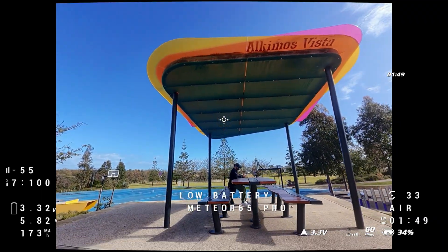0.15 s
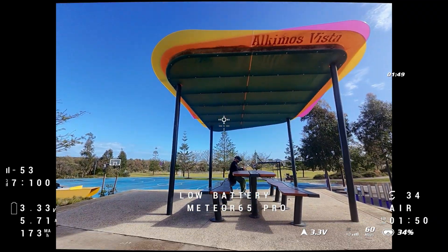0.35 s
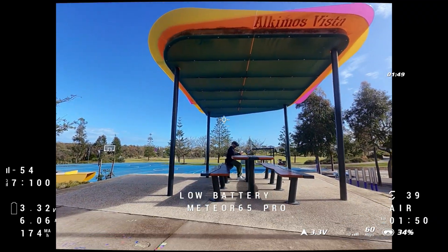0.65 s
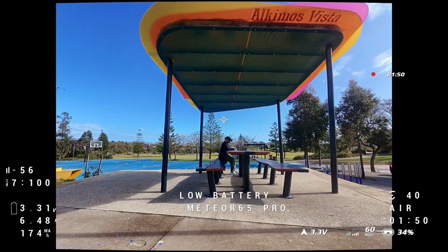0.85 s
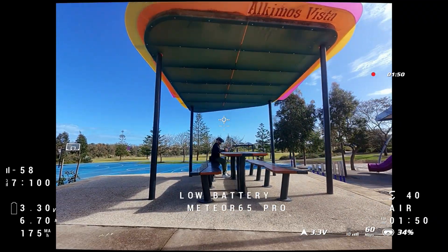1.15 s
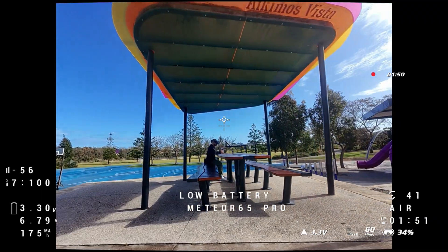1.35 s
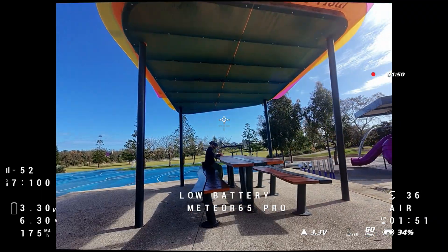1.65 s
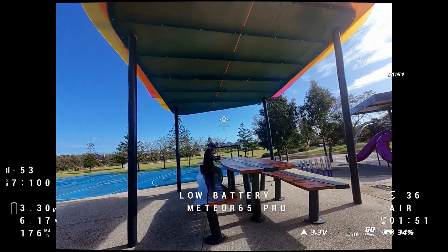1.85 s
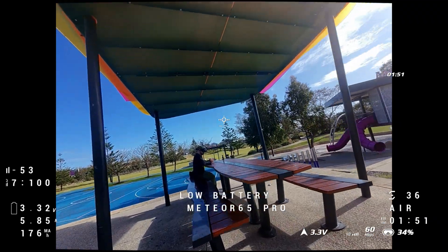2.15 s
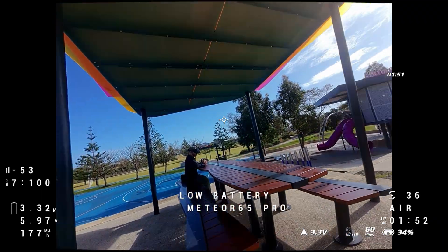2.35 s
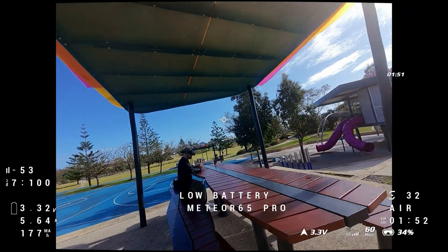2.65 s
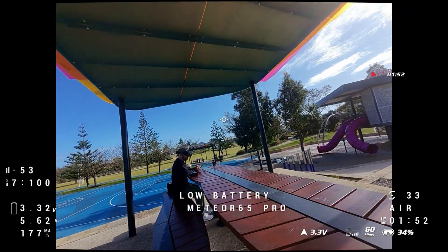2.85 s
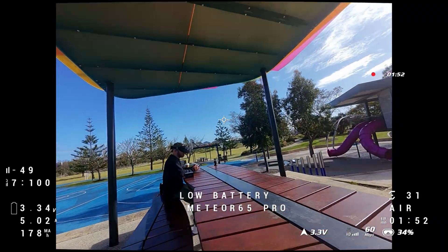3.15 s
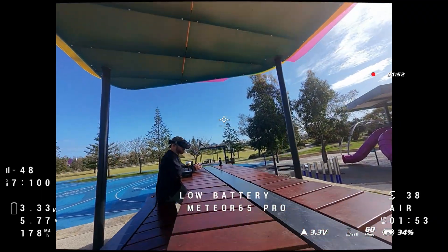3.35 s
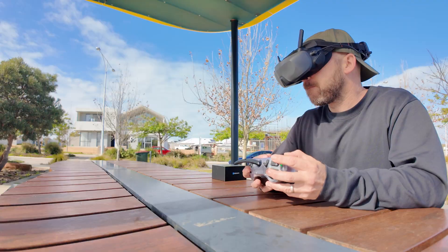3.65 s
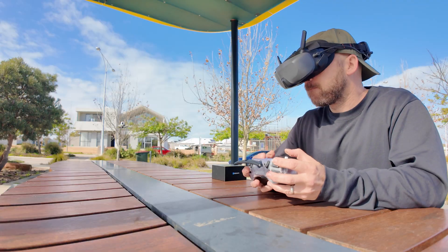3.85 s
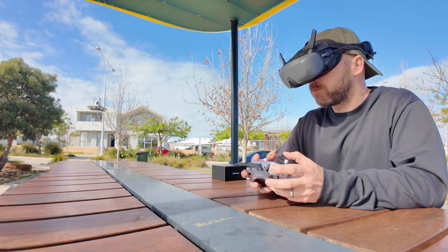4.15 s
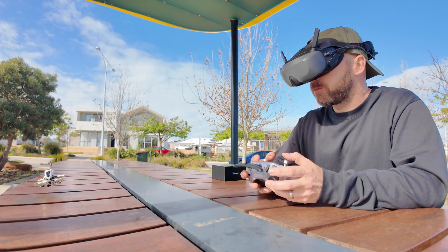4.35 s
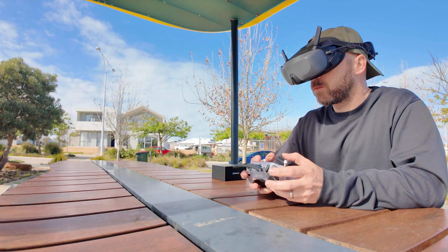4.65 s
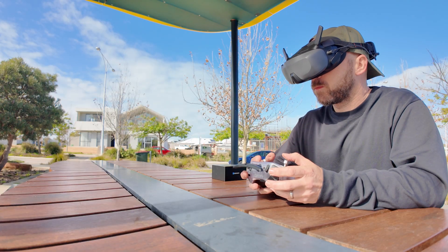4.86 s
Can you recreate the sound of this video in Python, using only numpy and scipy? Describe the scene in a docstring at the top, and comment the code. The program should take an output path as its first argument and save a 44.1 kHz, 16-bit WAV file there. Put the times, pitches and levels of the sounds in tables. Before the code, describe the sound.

Beating, nasal propeller tones start distant and swell toward a single close microphone outdoors. Raspy torn air surges midway, the pitch dips and rises, and the whine tightens over the tabletop before stopping almost instantly. A quiet pause follows, then a sharp cluster of plastic-on-wood knocks, a softer second bounce, and a few faint high clicks over low park background and slight shelter reflections.

```python
"""Small drone lands on a picnic table

Under a park shelter, a tiny four-rotor drone closes from about 8 m to 0.6 m, whining and hissing.
Rotor tones follow shaft and blade rates; coloured noise makes the torn air and the downwash.
The motors ring briefly at 5 kHz and cut; it drops onto the planks and bounces once: modes and noise bands.
Hand-controller switches click; a short roof echo and a faint outdoor rumble lie around it all."""
import sys
import numpy as np
from scipy import signal
from scipy.fft import rfft, irfft, next_fast_len
from scipy.io import wavfile

SR = 44100
rng = np.random.default_rng(int(sys.argv[2]) if len(sys.argv) > 2 else 0)


def file_out(sig):
    """Save sig as 16-bit WAV at sys.argv[1]."""
    # one column per channel
    cols = np.atleast_2d(sig).T
    # limit, then scale
    lim = np.clip(cols, -1, 1)
    pcm = np.round(lim * 32767).astype(np.int16)
    wavfile.write(sys.argv[1], SR, pcm)


N = 220896
TIME = np.arange(N) / SR  # s

# Spectrum levels below are relative: each coloured noise is scaled to rms 1 before its own level.
# Flight path: t/s, distance/m
DISTANCE = [(0, 7.9), (1.3, 6.6), (2.0, 7.6), (2.8, 5.33), (3.35, 3.59), (3.55, 1.3), (3.72, .85),
            (4.07, 0.62)]
# Blade-pass rates: t/s, fastest rotor f/Hz, slowest rotor f/Hz, place of the steering rotor between (0-1)
SPEED = [(0, 1451, 1376, 0.52), (.4, 1369, 1287, 0.28), (.9, 1494, 1315, 0.54), (1.2, 1563, 1410, 0.44),
         (1.55, 1521, 1391, .65), (1.85, 1483, 1351, .7), (2.25, 1480, 1312, 0.91),
         (2.55, 1509, 1304, 0.69), (3.0, 1444, 1238, .42), (3.27, 1319, 1114, 0.55),
         (3.45, 1477, 1256, .08), (3.58, 1590, 1297, 0.04), (3.7, 1723, 1445, 0.95),
         (3.9, 1662, 1436, 0.94), (4.07, 1645, 1470, .82)]
# Sinking into its own downwash turns clean overtones into rasp: t/s, turbulent share (0-1)
TURBULENCE = [(0, 0.15), (1.4, 0), (2.0, 0.52), (2.9, 0.99), (3.5, 0.27), (3.75, 0.27), (4.05, 0.46)]
# Rotors in the order of all per-rotor arrays
ROTOR_NAMES = ("fastest", "steering", "unbalanced", "slowest")
# Balance between those rotors: unbalance level/dB, blade tone level/dB, overtones level/dB (relative)
ROTOR_BALANCE = [(-2.5, 0.5, -7), (-15, 0.5, -5), (10.5, -4, -7.5), (4, 0, -11)]
UNBALANCED_SHARE = .26  # place of the unbalanced rotor: slowest 0, fastest 1
HOVER_HZ, DB_PER_SPEED_OCTAVE = 1515, 9  # all voices grow with mean blade-pass rate
CUSHION_S = 0.11  # build-up time constant of the air cushion over the table
MOTORS_OFF_S, SPIN_DOWN_T60_S, BRAKE_T60_S = 4.072, .125, .05

# Voice levels: level/dB at 1 m and hover speed, dB per halving of distance,
# dB added in full turbulence, dB added on the full cushion
HUM_LAW = (-65, 3.4, 13.5, 15)
WHINE_LAW = (-52, 5, -2.5, 5.5)
BUZZ_LAW = (-54, 5.5, -2, 4)
SIZZLE_LAW = (-53, 7, 1, -5)
RASP_LAW = (-53.5, 6.5, 2.5, -4)
HISS_LAW = (-50.5, 7, 7.5, -1)
RUSH_LAW = (-48.5, 6, -1.5, 5.5)
WASH_LAW = (-61, 12, -2.5, 9.5)
# A rotor's blade tone swells as the drone tilts: t/s, length/s, rotor, level/dB
WHINE_SWELLS = [(.8, .24, "unbalanced", 9), (1.3, .28, "fastest", 14.5), (1.29, 0.3, "steering", 9),
                (2.27, 0.17, "steering", 12), (2.62, 0.23, "fastest", 7.5), (3.02, 0.33, "unbalanced", 15),
                (3.12, 0.15, "slowest", 9.5), (3.28, .12, "steering", 11.5), (3.5, .2, "steering", 7.5),
                (3.72, 0.11, "fastest", 4), (3.95, 0.13, "steering", 7.5), (4.05, .05, "slowest", 5.5)]
# A rotor's overtones swell: t/s, length/s, rotor, level/dB
BUZZ_SWELLS = [(.1, .12, "steering", 8), (.66, 0.12, "steering", 2.5), (1.06, .16, "steering", 12.5),
               (1.35, 0.46, "unbalanced", 14), (3.1, 0.2, "fastest", 18), (3.52, 0.23, "fastest", 17.5),
               (3.77, 0.099, "steering", 7.5)]
# Surges of torn air: t/s, length/s, duct hiss level/dB, broad rush level/dB, blade rasp level/dB
SURGES = [(2.25, 0.16, 4, -3, -4), (2.65, 0.2, 5, 0, -2), (2.99, 0.12, 8.5, 2, 7.5),
          (3.11, 0.13, 6.5, 9, 13), (3.47, 0.17, 0.5, 0, 12.5)]
# Brief puff off the planks just before the cut: t/s, length/s, level/dB
PUFF = (4.046, 0.012, 10.7)

# Filter on the low blade overtones: f/Hz, level/dB
BUZZ = [(1900, -5), (2350, -31), (2700, 5.5), (3100, 0), (3450, -0.5), (3850, -33)]
# Filter on the high blade overtones: f/Hz, level/dB
SIZZLE = [(3700, -14), (4300, 5), (5200, 0.5), (5800, -12), (7300, -2), (9600, -2), (11000, -5),
          (13000, -26), (15500, -31)]
# Rasp of blades in turbulence: f/Hz, level/dB per Hz
RASP = [(2300, -63), (2750, -1), (3080, 4), (3300, -1), (3550, 5), (3800, -31)]
# Air torn by the blade tips in the ducts: f/Hz, level/dB per Hz
HISS = [(3950, -38), (4400, -8), (5200, -8.5), (5700, -16), (6400, -6), (7200, -2.5), (7900, -2.5),
        (8600, -2.5), (9300, -6), (10000, -7.5), (10700, -13.5), (12000, -52)]
# Broad rush of air: f/Hz, level/dB per Hz
RUSH = [(150, -21), (400, -8), (850, -9), (1400, -1), (2400, 1), (3400, 4), (3850, -3), (4500, 0.5),
        (8300, -1), (10300, -10), (12300, -4.5), (13300, -12), (14800, -16), (15500, -9.5)]
# Downwash on the planks: f/Hz, level/dB per Hz
WASH_COLOUR = [(25, -60), (40, -38), (90, -16), (250, -9), (600, 5), (900, 1.5), (1500, 6.5), (3000, 4),
               (6000, -22), (12000, 1), (16000, -20)]
# Reflections off table, paving and roof: delay at start/s, delay at end/s, level/dB
BOUNCES = [(.00094, 0.00076, -30.5), (.0024, .0037, -19), (.0061, .0094, -11)]

# Drone touches the table: t/s, then relative crack level/dB, frame ring level/dB, plank thud level/dB
CONTACTS = [(4.4623, -28, -63, -79), (4.4650, -23.5, -40, -43), (4.4667, -8, -25.5, -32.5),
            (4.4751, -19, -28.5, -26.5), (4.483, -27, -30.5, -37.5), (4.626, -41, -44, -39),
            (4.6380, -28.5, -36, -37), (4.6510, -29, -40.5, -23.5), (4.6600, -45.5, -44.5, -40.5),
            (4.8130, -78, -81, -52.5)]
# Dense clatter of ducts and blades: f/Hz, level/dB per Hz, t60/s
CRACK = [(151, -25, 0.14), (400, 5, 0.048), (875, 3, 0.067), (1140, 2.5, 0.033), (2170, 5.5, 0.079),
         (4000, 5.5, 0.03), (5200, 4.5, 0.048), (6240, -4.5, 0.11), (8500, -9.5, 0.047),
         (11400, -18, 0.019), (14370, -5, 0.054)]
# Modes of the plastic frame: f/Hz, level/dB, t60/s
FRAME = [(944, -10.5, 0.21), (1068, 0, 0.072), (1152, 1.5, 0.089), (1290, -7.5, .09), (1329, -4, 0.19),
         (1613, 1, 0.056), (1846, -26.5, 0.17), (2070, -13.5, 0.063), (2288, -12.5, 0.18),
         (2340, -11.5, 0.15), (3376, -6, 0.12), (4300, -15, 0.059), (4600, -17, 0.13), (5230, -2, 0.091),
         (6211, -22.5, 0.069), (14300, -19, .04)]
# Modes of the planks: f/Hz, level/dB, t60/s
PLANKS = [(162.4, -21, 0.82), (250, -8.5, 0.36), (284, -6.5, 0.17), (303, -4, 0.11), (337, -3, 0.27),
          (384, -13.5, 0.19), (581.8, -6.5, 0.44), (603, -5, 0.22), (661, -9, 0.29)]
# Dull boom of the table: f/Hz, level/dB per Hz, t60/s
BOOM = [(59.3, -5, 0.25), (170, -18.5, 0.89), (307, 5, 0.24), (446, -14.5, 0.48), (630, 1, 0.49),
        (865, -13, 0.26), (1350, 2.5, 0.077), (2230, -12.5, .1), (5950, -51, .05)]

# Short 5 kHz rings from the motors just before the cut (3.994, 4.051);
# later rows: hand-controller switches: t/s, relative level/dB
SHORT_RINGS = [(3.994, -35), (4.051, -35), (4.598, -46), (4.638, -32.5), (4.654, -36.5), (4.664, -40),
               (4.931, -52), (4.941, -46.5), (4.954, -42), (4.9632, -38)]
# Modes of each short ring: f/Hz, level/dB, t60/s
RING_MODES = [(4900, -5, .035), (5040, -6, .045), (5150, -4, .055), (5350, -5, .045)]
# Broad snap under each short ring: f/Hz, level/dB per Hz, t60/s
SNAP = [(60, -11, .3), (120, 5.5, 0.69), (770, 5.5, 0.68), (1300, -16, .1), (3660, 5, 0.055),
        (5200, -0.5, 0.029), (6400, 1, 0.056), (8240, 0.5, 0.066), (15100, -11, 0.034)]

SHELTER_T60_S, SHELTER_DB = 0.22, -18.5
# Open-air background: f/Hz, level/dB per Hz
PARK = [(25, -29), (42, -28.5), (60, 5.5), (90, 0.5), (160, 0), (220, -4.5), (300, -5.5), (700, -7),
        (1400, -9), (2800, -18), (4500, -32.5), (9000, -35.5), (16000, -35)]
PARK_DB = -60.5
CUTOFF_HZ = 15900


def drone():
    """Four rotors beat against each other and chop the air; all fades fast when the motors stop."""
    speeds = rotor_speeds()
    turbulent = np.clip(in_time(TURBULENCE)[0], 0, 1)
    levels = loudness(speeds, turbulent)
    rotors = [rotor(hz, wobble=.004, flutter_db=2.5, between_db=-11.0) for hz in speeds]
    shafts, blades, overtones, pulsing = zip(*rotors)
    tones = rotor_tones(shafts, blades, overtones, levels, turbulent)
    air = torn_air(pulsing, levels, turbulent)
    wash = from_db(levels["wash"]) * noise(WASH_COLOUR)
    # braked rotors go silent first, while the stirred air takes a moment to settle
    since_cut = np.maximum(TIME - MOTORS_OFF_S, 0)
    braked = from_db(-60 * since_cut / BRAKE_T60_S)
    settling = from_db(-60 * since_cut / SPIN_DOWN_T60_S)
    return tones * braked + bounced(air + wash) * settling


def rotor_tones(shafts, blades, overtones, levels, turbulent):
    """Unbalance hums at shaft rate, blades whine at blade rate; overtones thin out in turbulence."""
    unbalance_db, blade_db, overtone_db = np.transpose(ROTOR_BALANCE)
    hum = together(shafts, unbalance_db) * from_db(levels["hum"])
    whine = together(blades, blade_db, rotor_swells(WHINE_SWELLS)) * from_db(levels["whine"])
    low_overtones = [coloured(x, BUZZ) for x in overtones]
    buzz = together(low_overtones, overtone_db, rotor_swells(BUZZ_SWELLS)) * from_db(levels["buzz"])
    sizzle = coloured(together(overtones, overtone_db), SIZZLE) * from_db(levels["sizzle"])
    return hum + whine + np.sqrt(1 - turbulent) * (buzz + sizzle)


def torn_air(pulsing, levels, turbulent, chop=0.13):
    """Turbulent rasp, duct hiss and broad rush, all chopped by the passing blades."""
    rasp = np.sqrt(turbulent) * noise(RASP) * from_db(levels["rasp"])
    hiss = noise(HISS) * from_db(levels["hiss"] + 1.0 * drift(23))
    rush = noise(RUSH) * from_db(levels["rush"])
    return (rasp + hiss + rush) * rms_one(1 + chop * sum(pulsing))


def rotor(blade_hz, wobble, flutter_db, between_db, count=33, size=2048):
    """One three-bladed rotor: shaft hum, blade tone, overtones, and the pulsing of its blades."""
    # the flight controller keeps trimming the speed
    shaft_hz = blade_hz / 3 * (1 + wobble * drift(25))
    turns = np.cumsum(shaft_hz) / SR + rng.random()
    # one turn's pressure: unequal blades put weaker lines between the multiples of the blade rate
    orders = np.arange(count + 1)
    strengths = np.where(orders % 3, from_db(between_db), 1) * (orders > 3)
    phases = np.exp(2j * np.pi * rng.random(count + 1))
    cycle = irfft(strengths * phases, size)
    overtones = cycle[(turns * size).astype(int) % size]
    hum = np.sin(2 * np.pi * turns)
    pulsing = np.sin(6 * np.pi * turns)
    flutter = from_db(flutter_db * drift(33))
    return hum * flutter, pulsing * flutter, overtones * flutter, pulsing


def rotor_speeds():
    """Blade-pass rates of the four rotors: two set the range, two run in between."""
    fastest, slowest, steering = in_time(SPEED)
    spread = fastest - slowest
    return np.array([fastest, slowest + steering * spread, slowest + UNBALANCED_SHARE * spread, slowest])


def loudness(speeds, turbulent):
    """Level in dB of each voice, from distance, speed, turbulence, air cushion and surges."""
    halvings = -np.log2(np.maximum(in_time(DISTANCE)[0], 1e-2))  # of the distance, from 1 m
    effort_db = DB_PER_SPEED_OCTAVE * np.log2(speeds.mean(axis=0) / HOVER_HZ)
    cushion = np.exp(np.minimum(TIME - MOTORS_OFF_S, 0) / CUSHION_S)
    laws = dict(hum=HUM_LAW, whine=WHINE_LAW, buzz=BUZZ_LAW, sizzle=SIZZLE_LAW,
                rasp=RASP_LAW, hiss=HISS_LAW, rush=RUSH_LAW, wash=WASH_LAW)
    levels = {}
    for voice, (base_db, near_db, turbulent_db, cushion_db) in laws.items():
        place_db = near_db * halvings + cushion_db * cushion
        levels[voice] = base_db + effort_db + place_db + turbulent_db * turbulent
    hiss_surge, rush_surge, rasp_surge = swells(SURGES)
    levels["hiss"] += hiss_surge
    levels["rush"] += rush_surge
    levels["rasp"] += rasp_surge
    levels["wash"] += swells([PUFF])[0]
    return levels


def bounced(x):
    """Each moving reflection combs the sound with slowly sliding notches."""
    out, power = x.copy(), 1
    for first_s, last_s, level_db in BOUNCES:
        delay = np.linspace(first_s, last_s, N)
        out += from_db(level_db) * np.interp(TIME - delay, TIME, x)
        power += from_db(level_db) ** 2
    return out / np.sqrt(power)


def landing(crack_trim_db=-8.0, boom_db=-6.0):
    """The frame hits on an edge, rattles, bounces and comes down flat on the planks."""
    s, crack_db, frame_db, thud_db = np.transpose(CONTACTS)
    plastic = clatter(s, crack_db + crack_trim_db, CRACK) + struck(s, frame_db, FRAME)
    wood = clatter(s, thud_db + boom_db, BOOM) + struck(s, thud_db, PLANKS)
    return plastic + wood


def short_rings(snap_db=-14.0):
    """Motor rings before the cut, then controller switches: close 5 kHz modes over a broad snap."""
    s, level_db = np.transpose(SHORT_RINGS)
    return struck(s, level_db, RING_MODES) + clatter(s, level_db + snap_db, SNAP)


def shelter(x, dull_hz=3000):
    """Roof, posts and paving throw back a short, dull scatter: low-passed, decaying noise."""
    t = TIME[:SR // 2]
    decay = from_db(-60 * t / SHELTER_T60_S)
    scatter = rng.standard_normal(len(t)) * decay * (t > .008)  # first return after 8 ms
    scatter = signal.sosfilt(signal.butter(2, dull_hz, fs=SR, output="sos"), scatter)
    return signal.fftconvolve(x, scatter / np.linalg.norm(scatter))[:N]


def park():
    """Steady open-air rumble: low-weighted noise."""
    return from_db(PARK_DB) * noise(PARK)


def struck(times, levels_db, modes):
    """Every blow rings every mode as a decaying sine, each about a decibel off its usual strength."""
    out = np.zeros(N)
    for k, (hz, mode_db, t60) in enumerate(modes):
        r, w = from_db(-60 / (t60 * SR)), 2 * np.pi * hz / SR
        blows = clicks(times, levels_db + mode_db + rng.standard_normal(len(times)))
        ring = signal.lfilter([0, np.sin(w)], [1, -2 * r * np.cos(w), r * r], blows + 1e-18)
        out += (-1) ** k * ring  # neighbours swing in opposite sense
    return out


def clatter(times, levels_db, colour):
    """Countless close modes: noise that dies at its own pace in each band."""
    edges = np.geomspace(55, 16000, 24)  # Hz
    start = int(min(times) * SR)
    blows = clicks(times, levels_db)[start:]
    out, power = np.zeros(N), 0
    for low, high in zip(edges, edges[1:]):
        hz = np.sqrt(low * high)
        band_filter = signal.butter(2, [low, high], "band", fs=SR, output="sos")
        band = signal.sosfilt(band_filter, rng.standard_normal(N - start))
        band *= from_db(at_hz(colour, hz))
        r = from_db(-60 / (at_hz(colour, hz, axis=2) * SR))
        out[start:] += band * signal.lfilter([1], [1, -r], blows + 1e-18)
        power += np.var(band)
    return out / np.sqrt(power)


def clicks(times, levels_db):
    """One impulse for each event."""
    out = np.zeros(N)
    samples = np.round(np.asarray(times) * SR).astype(int)
    out[np.clip(samples, 0, N - 1)] = from_db(levels_db)
    return out


def together(voices, levels_db, swell_db=0):
    """Mix one voice of the four rotors; rms 1 between swells."""
    shares = from_db(levels_db) / np.linalg.norm(from_db(levels_db))
    return shares @ (np.array([rms_one(voice) for voice in voices]) * from_db(swell_db))


def swell(s, length_s):
    """A smooth bump of height 1; its length is taken at half height."""
    return .5 ** ((2 * (TIME - s) / length_s) ** 2)


def swells(rows):
    """Sum a table of swells: one dB curve for each of its level columns."""
    return sum(np.outer(levels_db, swell(s, length_s)) for s, length_s, *levels_db in rows)


def rotor_swells(rows):
    """Sum a table of swells into one dB curve for each rotor."""
    out = np.zeros((len(ROTOR_NAMES), N))
    for s, length_s, name, level_db in rows:
        out[ROTOR_NAMES.index(name)] += level_db * swell(s, length_s)
    return out


def drift(rate):
    """Slow random wander, spread 1: noise through two equal one-pole low-passes at rate/Hz."""
    r = np.exp(-80 * np.pi * rate / SR)  # run at one fortieth of the sample rate
    steps = rng.standard_normal(N // 40 + 2002)
    slow = signal.lfilter([1], [1, -2 * r, r * r], steps)[2000:]
    return np.interp(np.arange(N) / 40, np.arange(len(slow)), rms_one(slow))


def noise(spectrum):
    """Noise of a given colour, rms 1."""
    return coloured(rng.standard_normal(N), spectrum)


def coloured(x, spectrum):
    """Give a sound a colour; rms 1."""
    size = next_fast_len(N, real=True)
    hz = np.arange(size // 2 + 1) * SR / size
    return rms_one(irfft(rfft(x, size) * from_db(at_hz(spectrum, hz)), size)[:N])


def at_hz(points, hz, axis=1):
    """Read a column of a spectrum table on a log-frequency axis."""
    points = np.array(points)
    return np.interp(np.log(hz + 1e-9), np.log(points[:, 0]), points[:, axis])


def in_time(rows):
    """Each column of a curve table at every sample."""
    s, *columns = np.transpose(rows)
    return [np.interp(TIME, s, c) for c in columns]


def from_db(db):
    """Decibels to gain."""
    return 10 ** (np.asarray(db) / 20)


def rms_one(x):
    """Scale to unit power."""
    return x / np.sqrt(np.mean(x ** 2) + 1e-20)


def scene():
    """Drone, landing and short rings under the roof, with the park behind."""
    near = drone() + landing() + short_rings()
    return (near + from_db(SHELTER_DB) * shelter(near) + park())[None]


def record(dry):
    """One microphone channel, its top cut steeply by an elliptic low-pass."""
    return signal.sosfilt(signal.ellip(12, .1, 80, CUTOFF_HZ, fs=SR, output="sos"), dry)


dry = scene()
out = record(dry)
file_out(out)
```